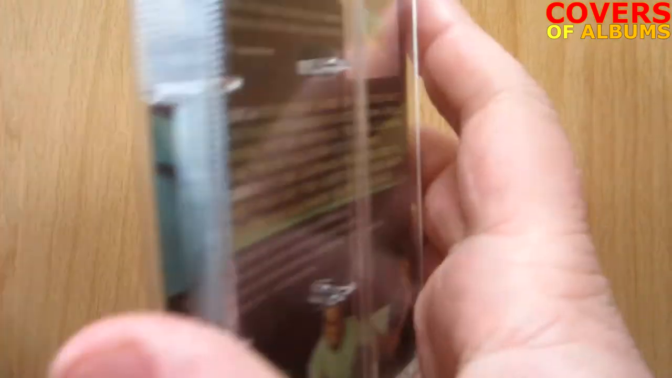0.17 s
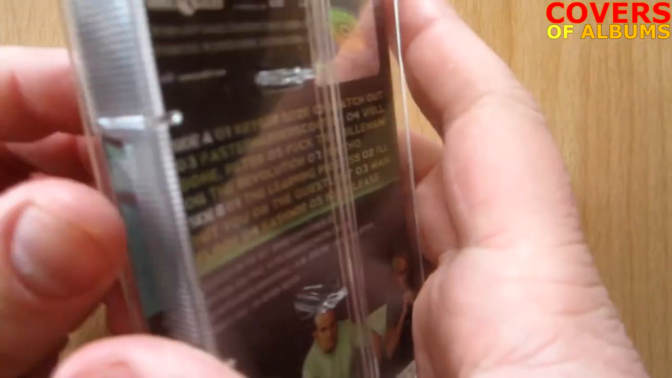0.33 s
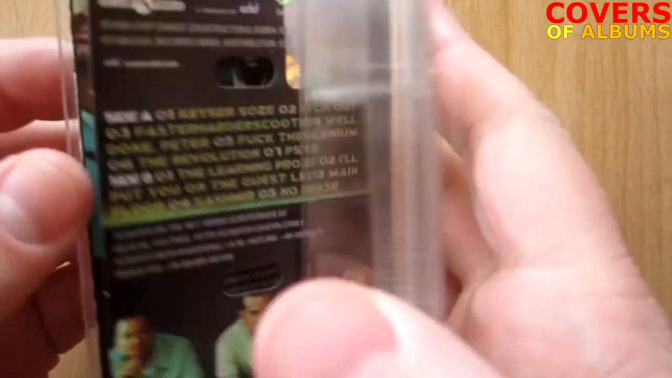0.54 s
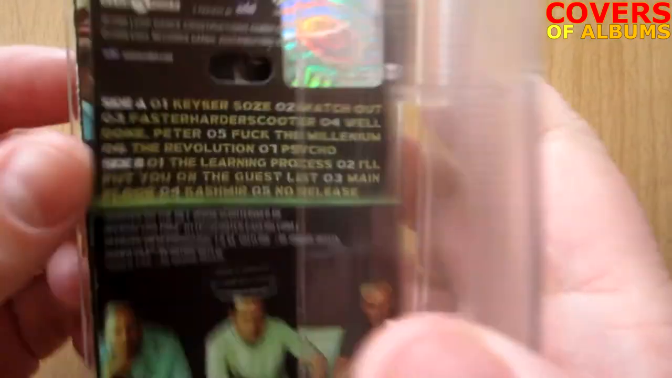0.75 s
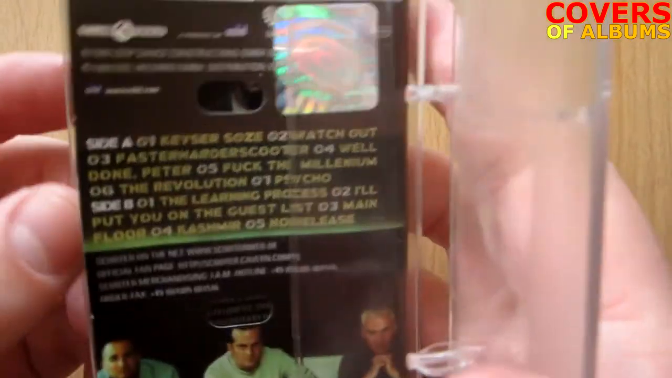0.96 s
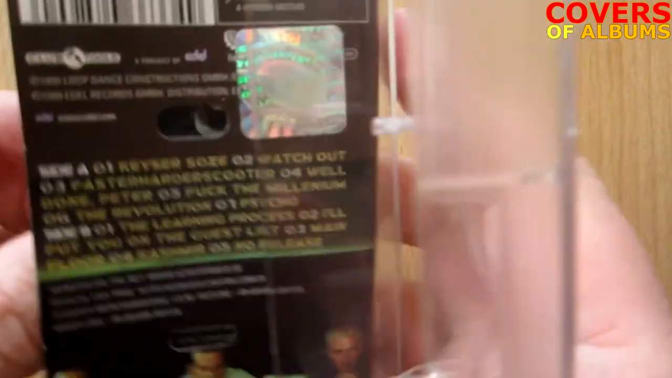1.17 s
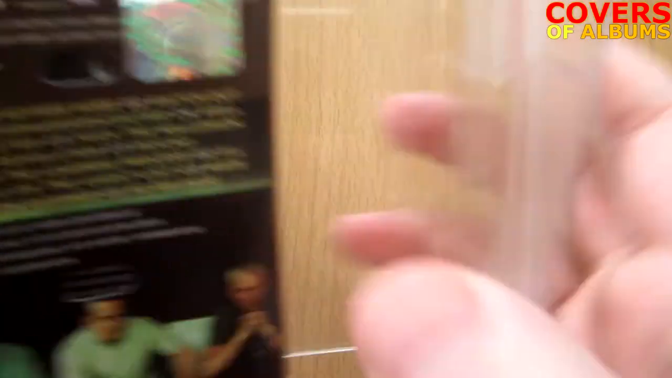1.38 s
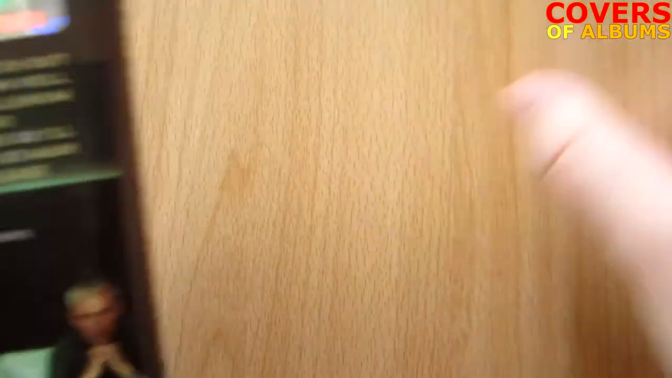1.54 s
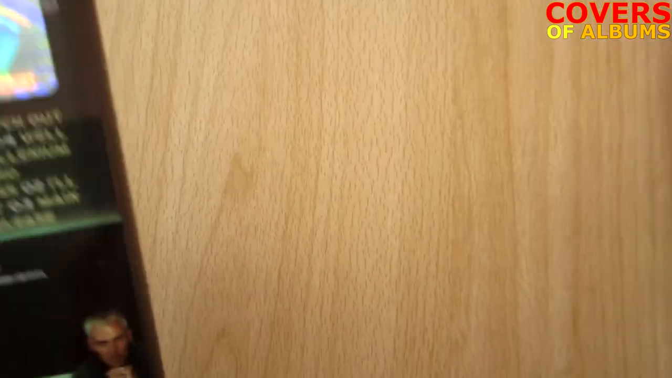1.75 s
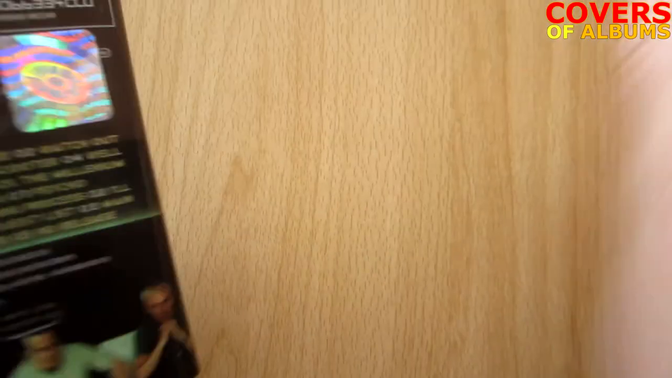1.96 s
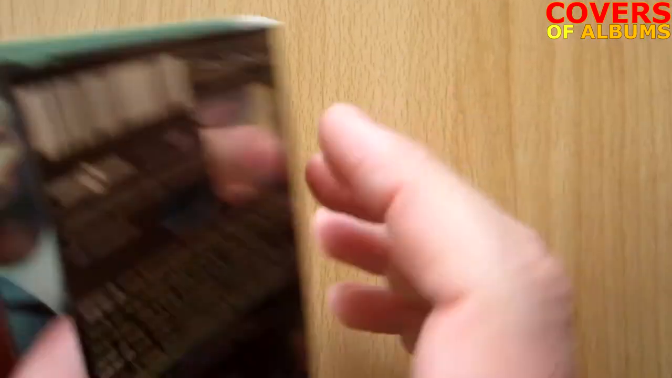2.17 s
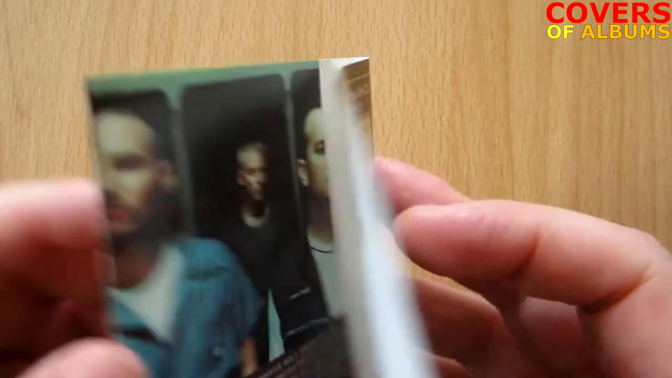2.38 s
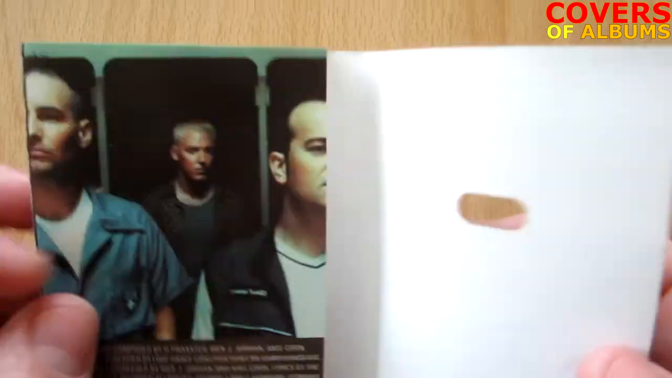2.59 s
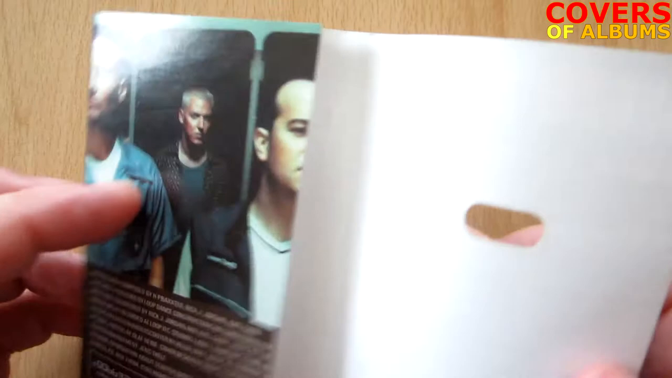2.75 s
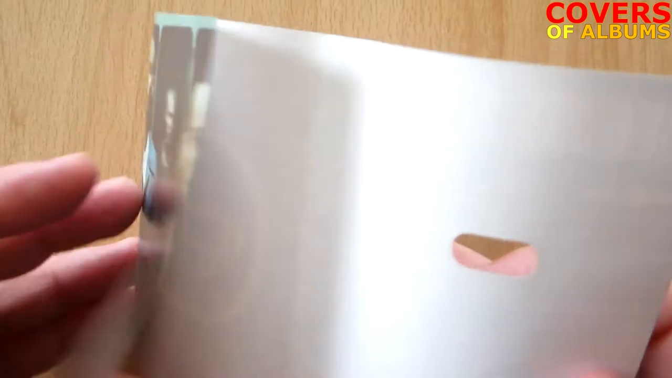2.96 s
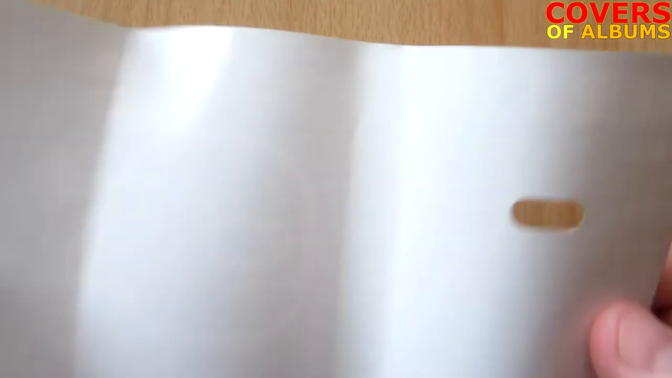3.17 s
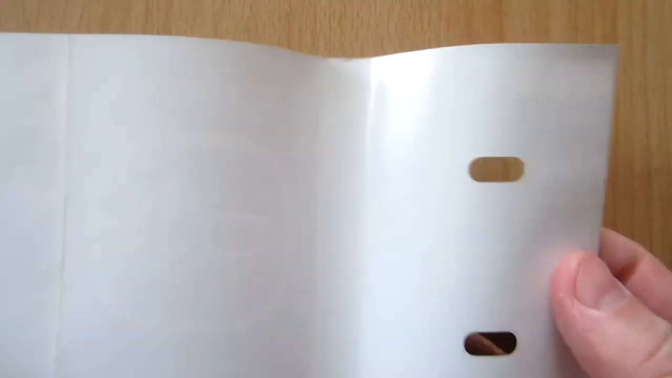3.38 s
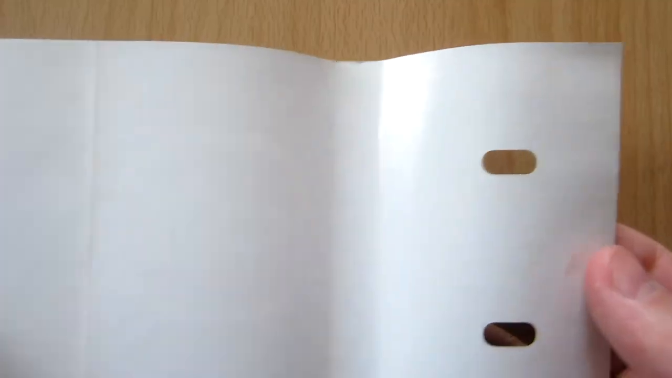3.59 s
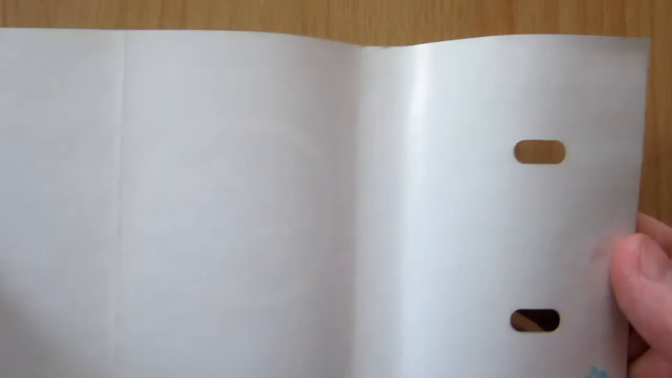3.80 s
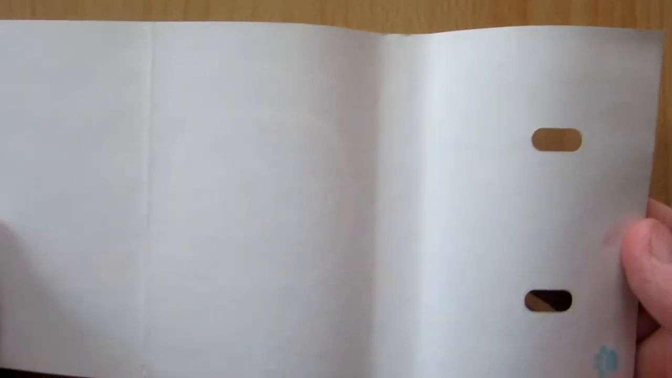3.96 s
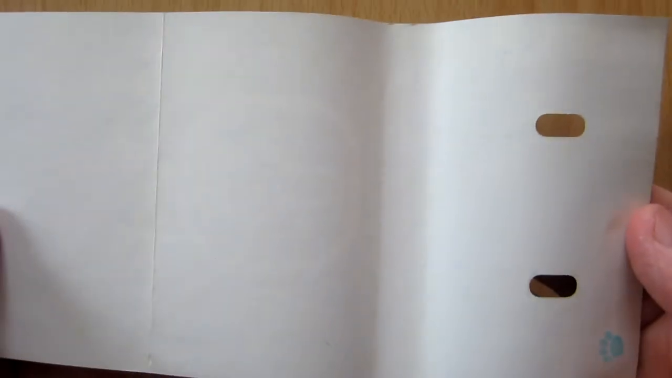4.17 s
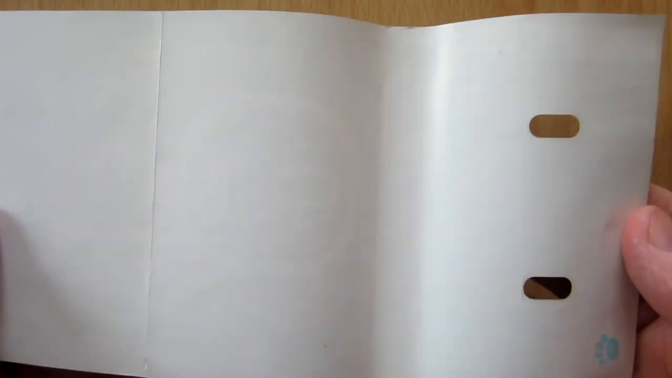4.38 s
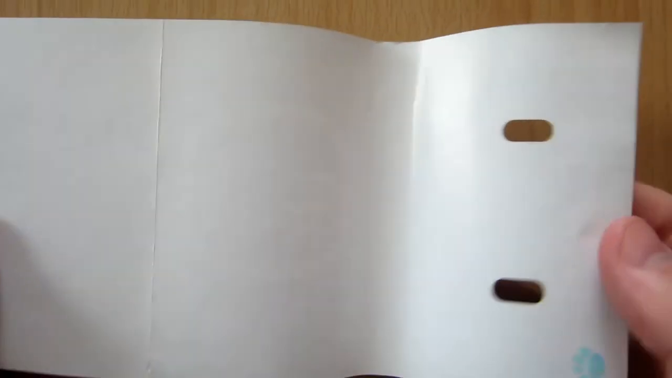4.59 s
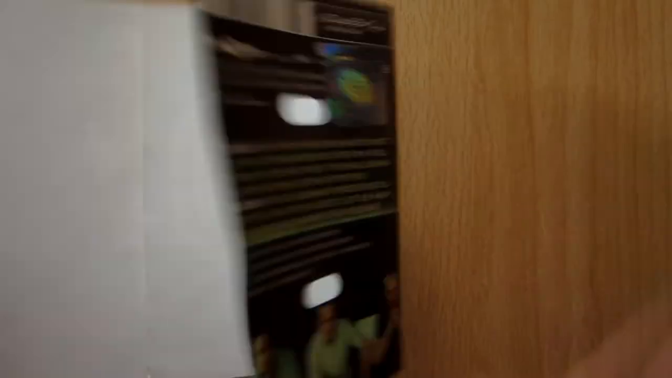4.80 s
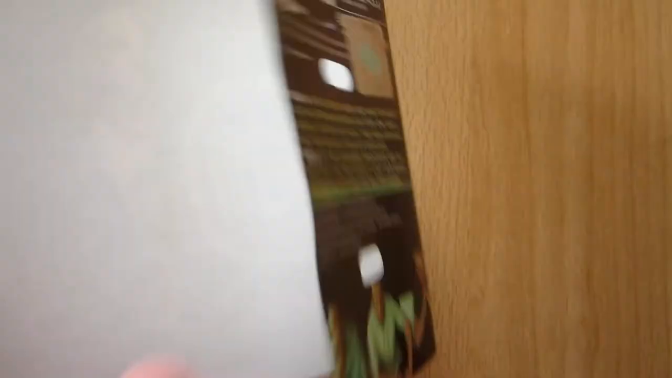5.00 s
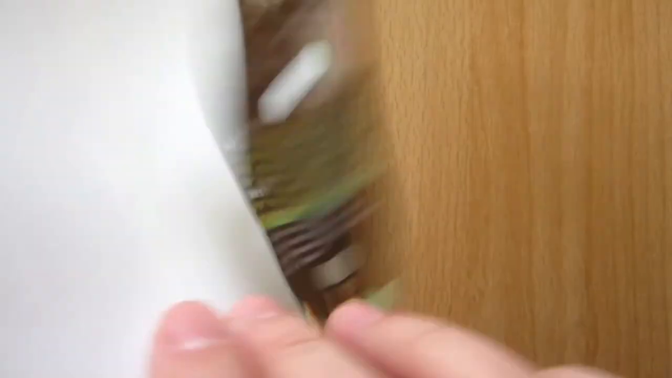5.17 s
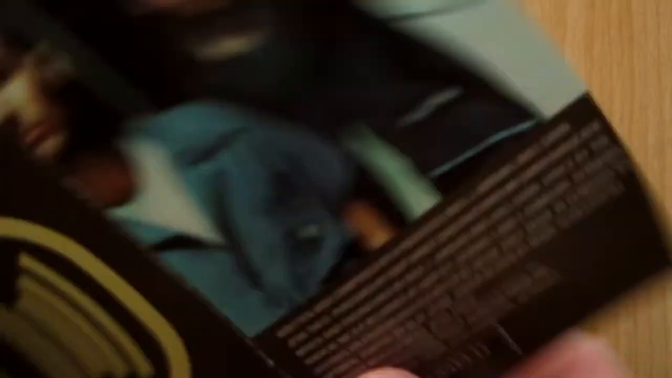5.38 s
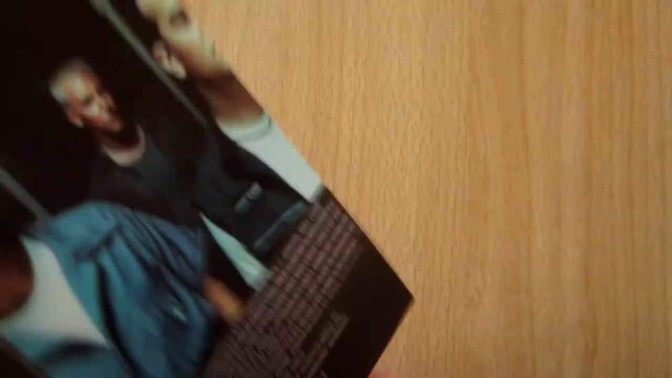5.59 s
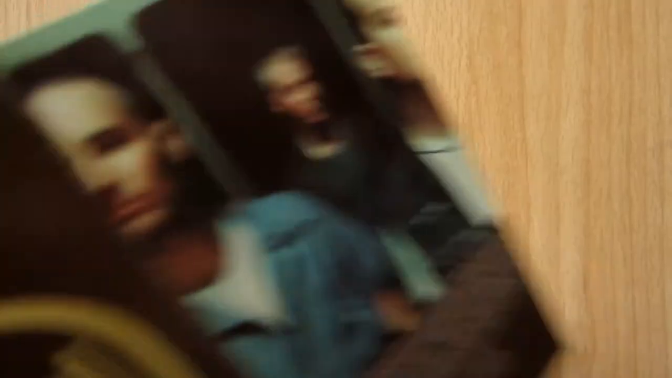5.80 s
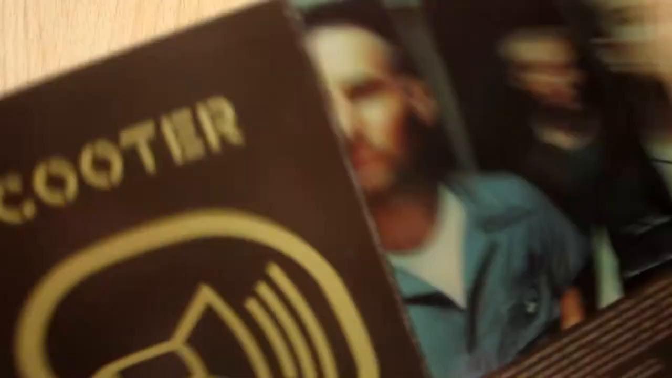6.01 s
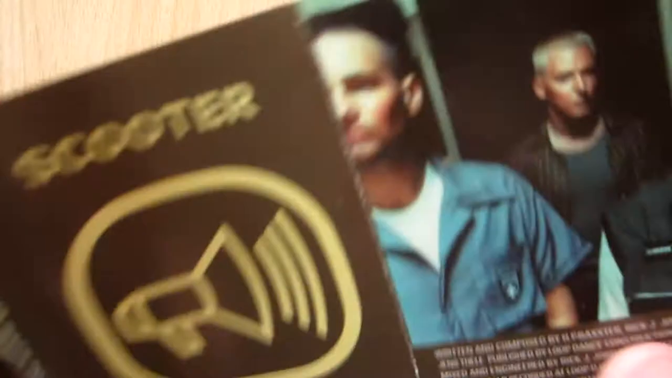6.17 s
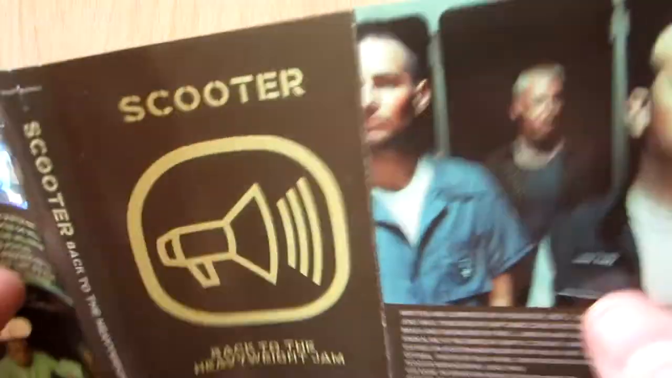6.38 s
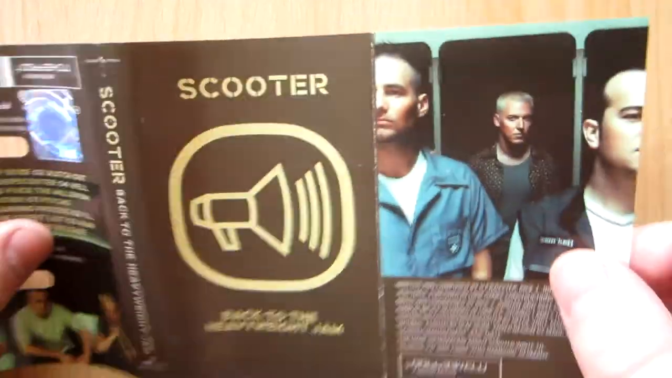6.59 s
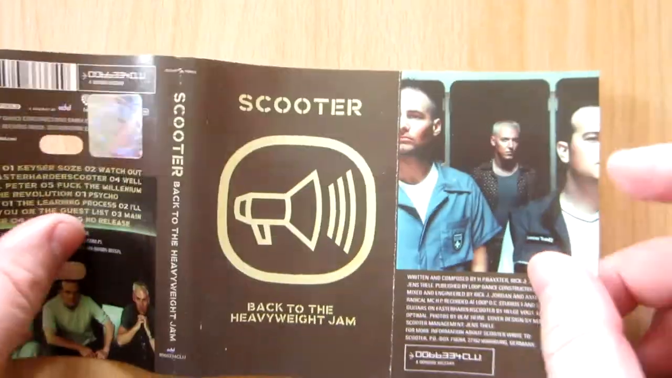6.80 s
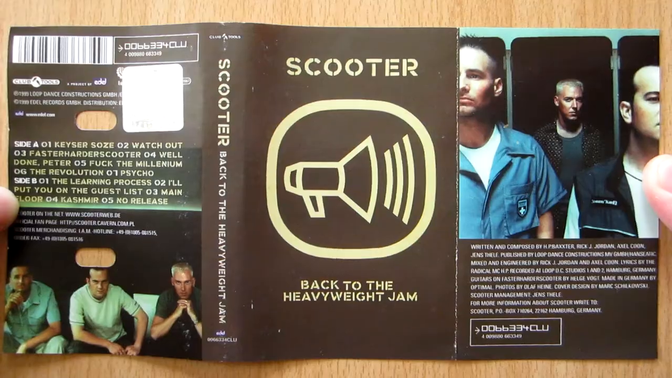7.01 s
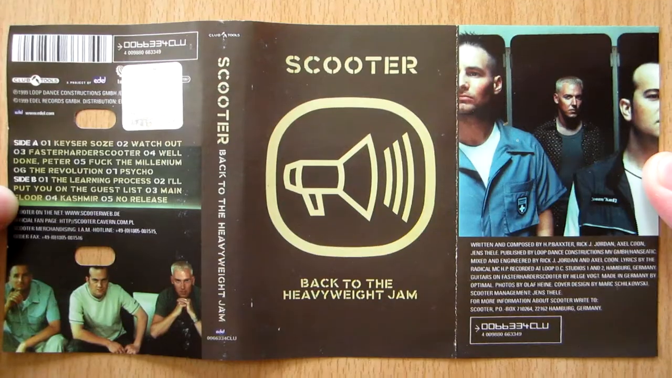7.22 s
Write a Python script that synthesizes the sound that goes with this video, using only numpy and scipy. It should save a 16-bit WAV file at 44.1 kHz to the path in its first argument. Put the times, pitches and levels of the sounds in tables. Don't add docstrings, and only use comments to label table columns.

```python
import sys
import numpy as np
from scipy import signal
from scipy.fft import rfft, irfft, next_fast_len
from scipy.io import wavfile
from scipy.ndimage import uniform_filter1d

SR = 44100
rng = np.random.default_rng(int(sys.argv[2]) if len(sys.argv) > 2 else 0)


def volts_from_db(level):
    exponent = np.asarray(level, float) / 20
    return 10 ** exponent


def dump_mix(stems):
    frames = np.atleast_2d(stems).T
    limited = np.clip(frames, -1, 1)
    pcm = np.round(limited * 32767).astype(np.int16)
    wavfile.write(sys.argv[1], SR, pcm)


N = 319725
TIME = np.arange(N) / SR

# t/s, peak level/dB, ring f/Hz, tick
# level/dB, decay/s
CASE_SNAPS = [(0.0245, 1, 2530, -8, 0.022), (0.037, -16.5, 3680, -13, 0.058),
              (0.167, -30, 1050, -32, 0.0057), (0.334, -45.5, 1120, -17.5, 0.04),
              (0.4092, -14, 1485, -19.5, 0.028), (0.436, -21, 1190, -32, 0.0115),
              (0.4757, -20, 3550, -10, 0.044), (0.5041, -11.5, 3000, -11, 0.033),
              (0.634, -24, 2230, -20, 0.031), (0.662, -17, 6050, -2.5, 0.021),
              (0.69, -22, 2000, -5.5, 0.021), (0.764, -33, 1700, -5, 0.033),
              (0.816, -27, 2460, -8, 0.02), (0.829, -29, 2150, -32, 0.012),
              (0.845, -26.5, 2380, -9, 0.014),
              (1.126, -13.5, 2100, -15, 0.014), (1.218, -24.5, 1830, -38, 0.022),
                  (1.267, -29.5, 2050, -19, 0.029), (1.345, -21, 2220, -8, 0.032),
                  (1.393, -37, 3000, -4, 0.02), (1.5, -25.5, 1700, -11, 0.059),
                  (1.524, -9, 3000, -12, 0.028), (1.612, -16.5, 3340, -11, 0.032),
                  (1.6185, -14, 1030, -4, 0.03), (1.685, -35.5, 3500, -5, 0.019),
                  (1.71, -19, 1080, -41, 0.011), (1.719, -16, 1860, -15.5, 0.04),
                  (1.733, -20, 1230, -45.5, 0.018), (1.802, -22, 1190, -23, 0.06),
                  (1.851, -14, 1014, -25, 0.028), (1.881, -18, 937, -12, 0.041),
                  (1.893, -2.5, 3020, -12.5, 0.025), (1.902, -13.5, 4440, -6, 0.049)]
# t/s, peak level/dB, ring f/Hz, knock level/dB,
# tick level/dB
CARD_POPS = [(2.24, -49, 2530, -15, -12), (2.256, -37.5, 2470, -44, -4), (2.275, -41, 2680, -30, -13),
             (2.298, -30, 2670, -27, -32), (2.307, -20.5, 2330, -15.5, -29),
             (2.391, -38, 2210, -12, -26), (2.435, -21, 3520, -13, -14.5),
             (2.51, -28.5, 2670, -15, -16), (2.577, -41, 4430, -33, -28), (2.69, -38, 1060, -3, -11),
             (2.816, -30, 5100, -11, -3.5), (2.87, -37, 3700, -15, -32), (2.968, -34, 5240, -17, -8),
             (3.007, -37, 3880, -12, -13), (3.266, -29.5, 4100, -13, -20),
             (3.307, -25, 910, 3.5, -12.5), (3.429, -25, 2100, -10, -14.5),
             (3.443, -25.5, 1980, -48, -20), (3.45, -29.5, 2010, -10, -17.5),
             (3.889, -34.5, 1880, -6, -18.5),
             (4.466, -42, 1210, 4, -6), (4.557, -49, 1480, -14.5, -16), (4.647, -38, 2520, -26, -11),
                 (4.705, -17.5, 2300, -33, -27), (4.723, -15.5, 3100, -9, -17), (4.793, -39, 1520, -7, -18),
                 (4.843, -43, 1200, -26.5, -29), (5.198, -17, 1520, -3.5, -15.5),
                 (5.224, -10, 1500, -5, -24), (5.246, -9, 5960, -26.5, -16),
                 (5.248, -15.5, 13000, -26, -28.5), (5.162, -32, 4700, -25, -20),
                 (5.331, -31.5, 2310, -39, -11), (4.813, -44, 1500, -20, -25),
             (5.636, -28, 2350, -9, -22), (5.654, -20, 2490, -4.5, -13), (5.808, -26, 2300, -32, -24),
                  (5.931, -41.5, 2260, -15, -29), (5.995, -23.5, 3000, -9, -18),
                  (6.098, -35, 2360, -2, -25), (6.133, -37.5, 2460, -1, -16), (6.181, -23.5, 2440, -3, -21),
                  (6.251, -30, 950, -42, -13), (6.308, -36.5, 2600, 13, -22), (6.549, -26.5, 2350, -10, -9),
                  (6.577, -25, 2040, 4, -21), (6.659, -27, 2120, -22, -5), (6.7, -29.5, 1850, -12.5, -20),
                  (6.768, -22.5, 2040, -21, -19), (6.789, -22, 2200, -4, -10)]
# t/s, peak level/dB, ring f/Hz, knock level/dB, tick level/dB
SHORT_TICKS = [(1.058, -25.5, 2220, -21, -31), (1.071, -34, 1700, -6, -27), (1.21, -26, 3000, -25, -19),
               (1.275, -22.5, 2130, -12, -23), (1.894, -5, 3200, -31.5, -10),
               (1.900, -8.5, 2077, -15, -15.5), (2.72, -49, 4420, -24, -9), (2.888, -43, 4000, -23, -11),
               (2.305, -28.5, 4300, -24, -18), (2.932, -40.5, 4050, -30, -10), (3.295, -35.5, 2500, 6, 0),
               (4.785, -48, 2260, -17.5, -25), (4.835, -42, 1500, 2, -31), (2.289, -48, 2655, -27, -4),
               (5.221, -19, 2600, -2, -7), (5.261, -22, 14000, -36, -15.5), (6.148, -37, 1480, 4, -14),
               (6.178, -26, 3870, -14.5, -7), (6.183, -12, 4530, -16.5, -14), (6.873, -42, 2880, -30, -9),
               (6.793, -12.5, 5090, -13, -5.5)]
# strongest t/s, rise/s, fall/s, body level/dB, sizzle over body/dB
CASE_RUBS = [(0.008, 0.02, 0.1, -42, -14.5), (0.48, 0.013, 0.042, -32, -10.5),
             (0.53, 0.013, 0.065, -50, -7.5), (0.64, 0.06, 0.093, -52.5, -11.5),
             (0.77, 0.051, 0.075, -49, -8.5), (0.961, 0.02, 0.018, -47.5, -11.5),
             (1.075, 0.021, 0.074, -36.5, -9), (1.225, 0.04, 0.1, -47, -12.5),
             (1.295, 0.08, 0.036, -37.5, -8.5), (1.345, 0.036, 0.028, -33.5, -4),
             (1.48, 0.063, 0.043, -47.5, -6), (1.578, 0.07, 0.015, -48, 1.5), (0.93, 0.053, 0.33, -61, -13),
             (1.746, 0.0027, 0.045, -44, -13), (1.811, 0.01, 0.026, -40, -12),
             (1.858, 0.018, 0.012, -27.5, -24)]
# strongest t/s, rise/s, fall/s, body level/dB,
# sizzle over body/dB
CARD_RUBS = [(2.4, 0.23, 0.33, -59.5, -1), (2.49, 0.022, 0.027, -42, -1.5),
             (2.575, 0.037, 0.041, -49.5, -2.5), (2.705, 0.0083, 0.2, -66, 7.5),
             (2.83, 0.015, 0.069, -57.5, 4.5), (3.044, 0.029, 0.026, -40, -2.5),
             (3.13, 0.072, 0.17, -58.5, -2.5), (3.268, 0.048, 0.023, -48.5, 0),
             (3.438, 0.12, 0.079, -54, 0), (3.574, .06, 0.21, -64, 0.5), (5.39, 0.015, 0.0099, -48, -7.5),
             (5.414, 0.01, 0.018, -44.5, -5),
             (4.709, 0.027, 0.0085, -35.5, -4.5), (4.74, 0.0038, .06, -49, -7),
             (5.149, 0.015, 0.032, -38.5, -8), (5.209, 0.032, 0.023, -32, -9),
             (5.25, 0.02, 0.025, -23, -27), (5.586, 0.021, 0.02, -44.5, -9.5),
             (5.677, 0.023, 0.017, -44.5, -7), (5.85, 0.16, 0.024, -52.5, -4.5),
             (5.989, 0.027, 0.22, -53.5, 3), (6.108, 0.01, 0.11, -46.5, 1.5), (6.178, 0.013, 0.013, -30, 2),
             (6.312, 0.031, 0.046, -46, 3.5), (6.439, 0.062, 0.06, -47, 5),
             (6.551, 0.024, 0.0061, -36, -14), (6.66, 0.15, .01, -49.5, -9),
             (6.703, 0.024, 0.11, -42.5, -2.5), (6.79, 0.049, 0.031, -34, -6.5),
             (6.913, 0.017, 0.049, -47, -7.5), (6.972, 0.069, 0.0077, -43, -3),
             (5.336, 0.0062, 0.012, -40, -6), (5.874, 0.056, 0.0063, -52, -2)]
# strongest t/s, rise/s, fall/s,
# level/dB, f/Hz
CASE_SINGS = [(.039, 0.008, 0.023, -30, 3370), (0.411, 0.0011, 0.0055, -23, 1700),
              (0.477, 0.0036, 0.006, -33, 3620), (.51, 0.021, 0.032, -33.5, 1600),
              (.51, 0.018, 0.034, -41.5, 3100), (.645, 0.0026, 0.0047, -48.5, 326),
              (.77, 0.015, 0.029, -41.5, 1730), (.818, .003, .004, -49, 5940),
              (4.733, 0.0062, 0.0094, -36, 1100),
              (1.37, .01, 0.034, -56, 4600), (1.45, 0.02, 0.013, -46.5, 2050),
                 (1.45, 0.033, 0.033, -49, 3180), (1.46, .03, 0.12, -53, 5060),
                 (1.526, 0.0012, 0.011, -22, 1800), (1.573, 0.015, 0.038, -41, 3450),
                 (1.58, 0.017, 0.034, -44.5, 1960), (1.582, 0.0033, 0.0043, -41, 1055),
                 (1.818, 0.0083, 0.0068, -35, 1880), (1.806, 0.0027, 0.024, -38.5, 3100),
                 (1.83, 0.023, 0.014, -40, 1104), (1.856, .006, 0.012, -28.5, 3080),
                 (1.874, 0.0054, 0.0056, -31.5, 1070), (1.875, 0.0031, 0.0059, -28, 2100),
                 (1.885, 0.0036, 0.0056, -23, 1006), (1.905, 0.0015, 0.015, -23.5, 3750)]
# strongest t/s, rise/s, fall/s, level/dB, f/Hz
SLIDE_SINGS = [(1.072, 0.021, 0.016, -35, 1830), (1.09, 0.038, 0.033, -43, 4070),
               (1.1, 0.015, 0.018, -47, 6400), (1.235, 0.01, 0.015, -43, 1910),
               (.49, 0.016, 0.042, -49, 427), (1.272, 0.011, 0.026, -40, 2080),
               (1.33, 0.033, 0.029, -35, 3740), (1.357, 0.011, 0.011, -37, 2370)]
# strongest t/s, rise/s, fall/s, level/dB, f/Hz
CARD_SINGS = [(2.36, 0.017, .03, -60.5, 9600), (2.495, 0.012, 0.011, -45.5, 2800),
              (2.49, 0.02, .015, -52, 7560), (2.565, 0.014, 0.011, -47.5, 2800),
              (2.57, .015, 0.02, -47.5, 4970), (2.57, 0.018, 0.039, -57, 9700),
              (0.028, 0.0026, 0.014, -39.5, 312), (2.71, .012, 0.011, -60, 4580),
              (2.587, 0.0044, 0.0084, -47, 478), (2.945, 0.011, 0.011, -57, 4240),
              (2.945, 0.013, .01, -60, 6150), (3.043, 0.015, 0.01, -39.5, 3360),
              (3.14, 0.025, 0.043, -57, 3000), (3.15, 0.049, 0.065, -63.5, 9900),
              (3.4, .02, 0.012, -58, 4450), (3.54, 0.021, 0.02, -60.5, 10100),
              (3.57, 0.024, 0.05, -63.5, 4960), (4.708, 0.0056, 0.0034, -28.5, 3150),
              (4.708, .005, 0.0036, -31, 5000), (5.657, 0.0049, 0.006, -38, 300),
              (4.797, 0.0027, 0.0032, -43, 1930), (5.195, .006, 0.051, -36, 940),
              (5.212, 0.014, .01, -45, 13000), (5.241, 0.0088, 0.005, -18, 2210),
              (5.253, 0.004, 0.01, -20.5, 2520), (5.302, 0.0042, 0.0059, -48, 300),
              (5.335, 0.0026, 0.0096, -42, 2340), (5.585, 0.0096, 0.0099, -60, 3580),
              (5.814, 0.008, 0.013, -46.5, 458), (5.229, 0.0047, 0.011, -24, 3000),
              (6.11, 0.0067, 0.0092, -45, 2510), (6.186, 0.014, 0.0077, -41.5, 1010),
              (6.33, 0.01, 0.021, -49, 2720), (6.581, 0.002, 0.0071, -33, 1310),
              (6.635, 0.018, .015, -48, 2520), (6.714, .004, .004, -43.5, 6030),
              (6.769, .002, 0.0049, -29, 2160), (6.794, 0.0045, 0.0077, -26, 2120),
              (6.794, 0.0028, 0.0027, -22.5, 4930), (6.95, 0.028, 0.011, -55, 2300)]
# f/Hz, width/Hz, level/dB
CASE_MODES = [(1000, 110, -7), (1680, 100, 0), (1880, 110, -2), (2350, 150, -8), (3100, 110, -2),
              (3620, 120, -1), (4750, 140, -8)]
# f/Hz, width/Hz, level/dB
CARD_MODES = [(1700, 2000, 2), (2300, 350, 13), (2940, 2100, 15.5), (4470, 710, 6), (5220, 230, -6.5)]
# strongest t/s, rise/s, fall/s, level/dB
FLEX = [(1.724, 0.0019, 0.04, -34.5), (1.89, 0.1, 0.011, -36), (2.57, 0.014, 0.031, -50.5),
        (4.728, 0.0026, 0.013, -33), (4.86, 0.03, 0.0079, -59.5), (5.145, 0.0065, 0.033, -41),
        (5.215, 0.03, 0.011, -25.5), (5.262, 0.034, 0.032, -26.5), (5.806, 0.0097, 0.031, -48),
        (5.863, 0.0078, 0.018, -43.5), (6.585, 0.0039, 0.016, -39), (1.622, 0.027, 0.0048, -34),
        (5.66, 0.0025, 0.014, -35)]
# t/s, level/dB
STIRRED_AIR = [(0.0, -75.5), (1.309, -68.5), (1.77, -75.5), (1.922, -94), (2.26, -77), (2.52, -66),
               (5.052, -67.5), (6.081, -62.5), (7.25, -71.5)]
# strongest t/s, rise/s, fall/s, level/dB
FAN = [(0.03, 0.0083, 0.099, -57), (4.718, 0.01, 0.098, -46), (5.165, 0.039, 0.017, -47.5),
       (5.22, 0.037, 0.07, -29.5), (5.3, 0.04, 0.047, -37), (6.0, 0.034, 0.19, -52.5),
       (6.16, 0.04, 0.14, -49), (5.69, 0.039, 0.055, -63), (5.85, 0.033, 0.051, -49),
       (6.1, 0.085, 0.051, -60), (6.68, 0.034, 0.064, -57), (3.3, 0.1, 0.08, -60)]
# t/s, peak level/dB, f/Hz
PUFFS = [(0.027, -46.5, 247), (0.483, -54, 114), (0.635, -58, 101), (1.128, -56.5, 69), (2.3, -58, 100),
         (2.442, -54, 77.5), (2.587, -69, 54.5), (3.299, -57.5, 226), (4.708, -53.5, 163.4),
         (4.84, -56.5, 193), (5.653, -38, 142), (5.81, -53, 115), (5.996, -45, 135), (6.177, -50, 120),
         (6.584, -46.5, 224), (6.951, -61, 52.6)]
# t/s, f/Hz, level/dB
SQUEAK = [(3.64, 12900, -78.5), (3.7, 12800, -84), (3.79, 11800, -79), (3.85, 10630, -72)]
# f/Hz, t60/s, level/dB
ROOM = [(300, 0.16, -7), (1381, 0.17, -13.5), (3950, 0.25, -19.5), (12000, 0.31, -21.5)]
# f/Hz, level/dB per Hz
HISS_COLOUR = [(15, -41), (25, -4.5), (131, -6), (410, -10.5), (952, -13), (1060, -13), (1250, -14.5),
               (6730, -24), (13600, -29.5), (16500, -63.5)]
# t/s, level/dB
HISS_LEVEL = [(0, -39.5), (.03, -56.5), (.32, -67), (.42, -58), (1.88, -54.5), (1.92, -67.5), (2.22, -74.5),
              (2.261, -61.5), (3.599, -58), (4.1, -61), (5.15, -59), (6.97, -56), (6.99, -66.5),
              (7.25, -64)]

CASE_REACH, CARD_REACH = 2.5, 8


def case_snaps():
    s, db, hz, tick_db, decay = np.transpose(CASE_SNAPS)
    knock_db = -13.5 + 0.19 * tick_db
    snaps = np.transpose([s, db, hz, knock_db, tick_db])
    return clicks(snaps, decay, CASE_MODES, broad_db=-9.0, ring_db=-0.7, rise=.03, reach=CASE_REACH)


def card_creases():
    pops = CARD_POPS
    return clicks(pops, 0.0242, CARD_MODES, broad_db=-17.0, ring_db=-5.5, rise=0.0824, reach=CARD_REACH)


def short_ticks():
    return clicks(SHORT_TICKS, 0.014, CARD_MODES, broad_db=-6.5, ring_db=3.5, rise=0.055, reach=CARD_REACH)


def case_scrapes():
    return rubs(CASE_RUBS, CASE_MODES, edge_db=3.0, sheet_hz=3000, broad_db=-12.5,
                rough_db=3.5, flicker_db=3.5, free_db=-0.5)


def card_strokes():
    return rubs(CARD_RUBS, CARD_MODES, edge_db=18.5, sheet_hz=3370, broad_db=-79.5,
                rough_db=3.0, flicker_db=3.0, free_db=-11.0)


def singing_panels():
    narrow = [(*row, 1.06) for row in CASE_SINGS]
    wide = [(*row, 1.14) for row in SLIDE_SINGS + CARD_SINGS]
    return sings(narrow + wide)


def clicks(events, decay, modes, broad_db, ring_db, rise, reach):
    t = np.arange(2048) / SR
    s, db, hz, knock_db, tick_db = np.transpose(events)
    decay = np.maximum(decay * np.ones(len(s)), .003)[:, None]
    shape = np.minimum(t / (rise * decay), 1) * np.exp(-np.log(1000) * t / decay)
    crack = 1 + 1.54 * np.exp(-((t - rise * decay) / 0.00011) ** 2)
    chatter = rng.standard_normal((len(s), 2, len(t)))
    push, scratch = np.moveaxis(chatter, 1, 0) * shape * crack
    own = np.array([band(p, f / 1.2, f * 1.2) for p, f in zip(push, hz)])
    soft = np.array([band(p, 280, reach * f) for p, f in zip(push, hz)])
    knock = band(push, 350, 1200)
    parts = [body(soft, modes, broad_db), own, knock, treble(scratch)]
    gains = [0 * s, ring_db + 0 * s, knock_db, tick_db + 8.0]
    click = 0
    for gain_db, part in zip(gains, parts):
        click = click + volts_from_db(gain_db)[:, None] * part / np.abs(part).max(axis=1, keepdims=True)
    click = click * (volts_from_db(db) / np.abs(click).max(axis=1))[:, None]
    out = np.zeros(N)
    for start, one in zip((s * SR).astype(int), click):
        out[start:start + len(t)] += one
    return out


def rubs(rows, modes, edge_db, sheet_hz, broad_db, rough_db, flicker_db, free_db):
    grains = slips(rough_db, flicker_db, hold=150)
    sizzle = unit(treble(slips(rough_db, flicker_db, hold=300)))
    out = np.zeros(N)
    grips = rng.uniform([6500, -1], [11000, 1], (len(rows), 2))
    for (*shape, bright_db), (patch_hz, bend) in zip(rows, grips):
        on, gain = stroke(*shape, edge_db)
        free_hz = np.clip(sheet_hz * 2 ** (bright_db / 24), .62 * sheet_hz, 5000)
        bent = [(hz * (1 + .06 * bend), width, db) for hz, width, db in modes]
        ring = unit(body(grains[on], bent, broad_db))
        ring = unit(band(ring, free_hz / 2.3, 9000))
        along, glide = np.linspace(0, np.pi / 2, len(gain)), 1.1
        low, high = (unit(band(grains[on], f / 1.12, f * 1.12)) for f in (free_hz / glide, free_hz * glide))
        sheet = volts_from_db(free_db) * (np.cos(along) * low + np.sin(along) * high)
        patch = .18 * unit(band(sizzle[on], patch_hz / 1.08, patch_hz * 1.08))
        dull = (ring + sheet) / np.hypot(1, volts_from_db(free_db))
        out[on] += gain * (dull + volts_from_db(bright_db) * (sizzle[on] + patch))
    return out


def sings(rows):
    grains, out = slips(rough_db=1.5, flicker_db=2.5, hold=150), np.zeros(N)
    for s, rise, fall, db, hz, width in rows:
        rise, fall = max(rise, .0015), max(fall, .0015)
        on = slice(max(int((s - 2 * rise) * SR), 0), int((s + 2 * fall) * SR))
        lead = min(on.start, 400)
        t = TIME[on] - s
        ring = unit(band(grains[on.start - lead:on.stop], hz / width, hz * width)[lead:])
        out[on] += ring * volts_from_db(db - 9 * np.maximum(-t / rise, t / fall) ** 2)
    return out


def slips(rough_db, flicker_db, hold):
    grip = uniform_filter1d(np.repeat(rng.standard_normal(N // hold + 1), hold), hold)[:N]
    grain = np.minimum(rng.exponential(size=N), 5)
    return rng.standard_normal(N) * volts_from_db(rough_db * grain + flicker_db * grip)


def body(x, modes, broad_db):
    rings = 0
    for hz, width, db in modes:
        rings = rings + volts_from_db(db) * signal.lfilter(*signal.iirpeak(hz, hz / max(width, 90), fs=SR), x)
    return band(rings, 860, 5100) + volts_from_db(broad_db) * band(x, 1600, 6160)


def treble(x):
    return band(signal.lfilter(*signal.butter(1, 6000, fs=SR), x), 4600, 14800)


def stroke(s, rise, fall, db, edge_db):
    rise, fall = max(rise, .003), max(fall, .003)
    on = slice(max(int((s - rise) * SR), 0), int((s + fall) * SR))
    t = TIME[on] - s
    touch = np.clip(np.minimum(t + rise, fall - t) / 0.011, 0, 1)
    return on, touch * volts_from_db(db - edge_db * np.maximum(-t / rise, t / fall))


def swells(rows, edge_db):
    gain = np.zeros(N)
    for row in rows:
        on, shape = stroke(*row, edge_db)
        gain[on] += shape
    return gain


def band(x, low_hz, high_hz):
    sos = signal.butter(3, [low_hz, min(high_hz, .45 * SR)], "band", fs=SR, output="sos")
    return signal.sosfilt(sos, x)


def unit(x):
    return x / np.sqrt(np.mean(x ** 2))


def flex():
    rumble = unit(band(slips(rough_db=-5.0, flicker_db=4.5, hold=300), 290, 1600))
    return swells(FLEX, edge_db=11.5) * rumble


def flap():
    s, db = np.transpose(STIRRED_AIR)
    gain = volts_from_db(np.interp(TIME, s, db)) + swells(FAN, edge_db=13.5)
    out = gain * unit(band(slips(rough_db=-1.5, flicker_db=2.0, hold=900), 25, 270))
    t = np.arange(8192) / SR
    for s, db, hz in PUFFS:
        puff = volts_from_db(db + 15.5) * np.sin(2 * np.pi * hz * t) * np.exp(-hz * t / 1.17)
        out[int(s * SR):][:len(t)] -= puff
    return out


def squeak():
    s, hz, db = np.transpose(SQUEAK)
    on = (TIME > s[0]) & (TIME < s[-1])
    phase = 2 * np.pi * np.cumsum(np.interp(TIME, s, hz)) / SR
    return on * volts_from_db(np.interp(TIME, s, db)) * np.sin(phase)


def room(x):
    hz, t60, db = np.transpose(ROOM)
    late = np.pad(x, (int(0.0012 * SR), 0))[:N]
    out, step = 0, 2 ** (1 / 4)
    for f in 300 * 2 ** np.arange(0, 6, .5):
        keep = np.exp(-2 * np.log(1000) / np.interp(np.log(f), np.log(hz), t60) / SR)
        energy = signal.lfilter([1 - keep], [1, -keep], band(late, f / step, f * step) ** 2)
        echo = unit(band(rng.standard_normal(N), f / step, f * step))
        out = out + volts_from_db(np.interp(np.log(f), np.log(hz), db)) * np.sqrt(energy) * echo
    return out


def hiss():
    size = next_fast_len(N)
    hz, db = np.transpose(HISS_COLOUR[:-1] + [(15000, -46.0), (15800, -46.0)])
    colour = volts_from_db(np.interp(np.log(np.fft.rfftfreq(size, 1 / SR) + 1), np.log(hz), db))
    air = irfft(rfft(rng.standard_normal(size)) * colour, size)[:N]
    s, level_db = np.transpose(HISS_LEVEL)
    return volts_from_db(np.interp(TIME, s, level_db)) * unit(air)


def scene():
    case = case_snaps() + case_scrapes()
    card = card_creases() + card_strokes()
    near = case + card + flex() + short_ticks() + singing_panels()
    air = hiss()
    echo = room(near + air / 100)
    return (near + echo + flap() + squeak() + air)[None]


def top_cut(x):
    return signal.sosfilt(signal.butter(12, 16960, fs=SR, output="sos"), x)


def record(dry):
    rounded = np.tanh(dry / 1.043) * 1.151
    top = signal.ellip(8, .5, 60, 16300, fs=SR, output="sos")
    return top_cut(signal.sosfilt(top, rounded))


dry = scene()
out = record(dry)
dump_mix(out)
```